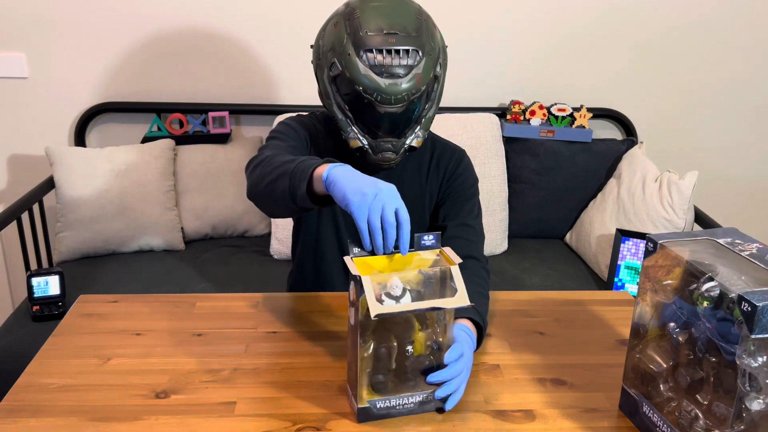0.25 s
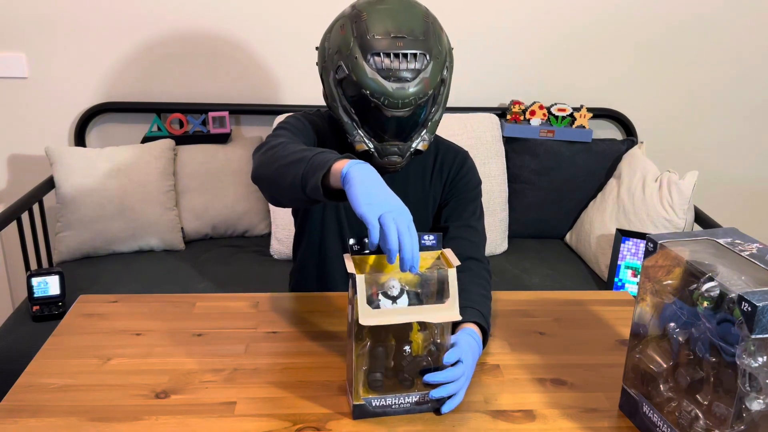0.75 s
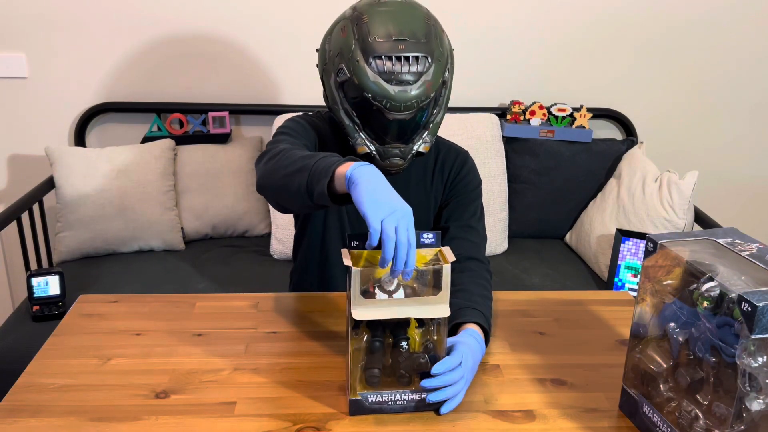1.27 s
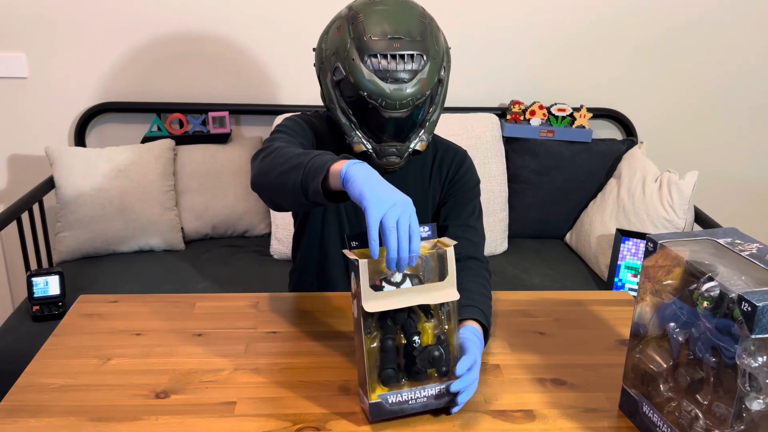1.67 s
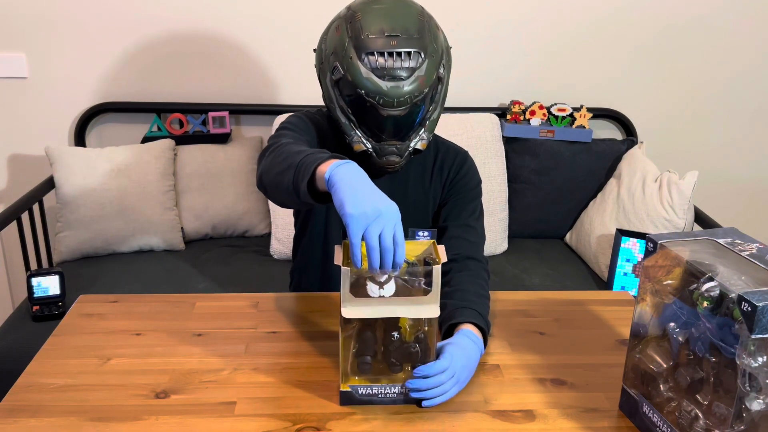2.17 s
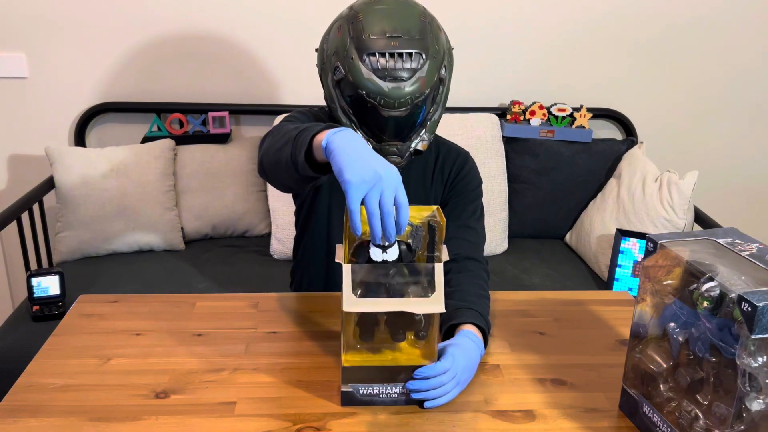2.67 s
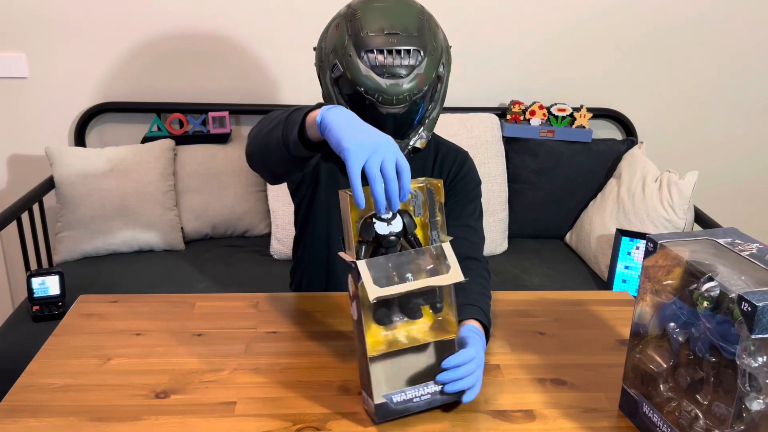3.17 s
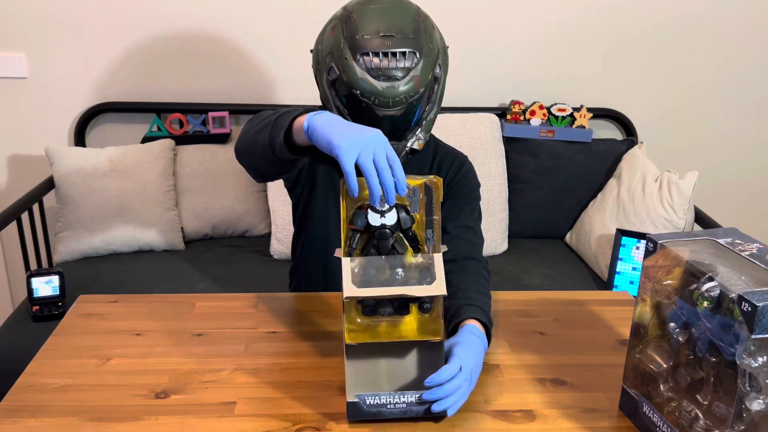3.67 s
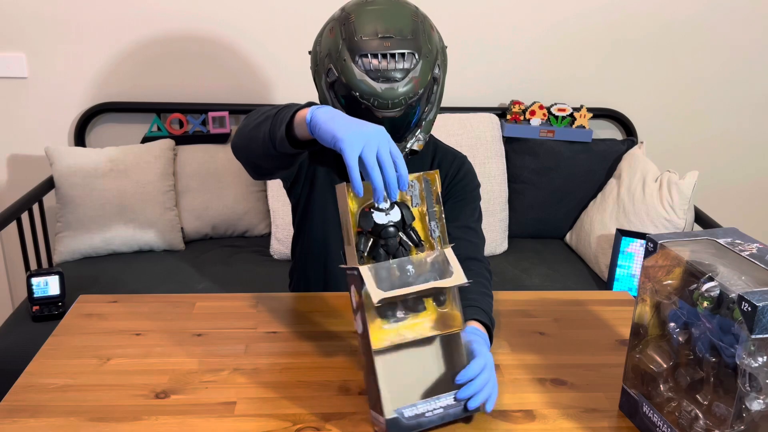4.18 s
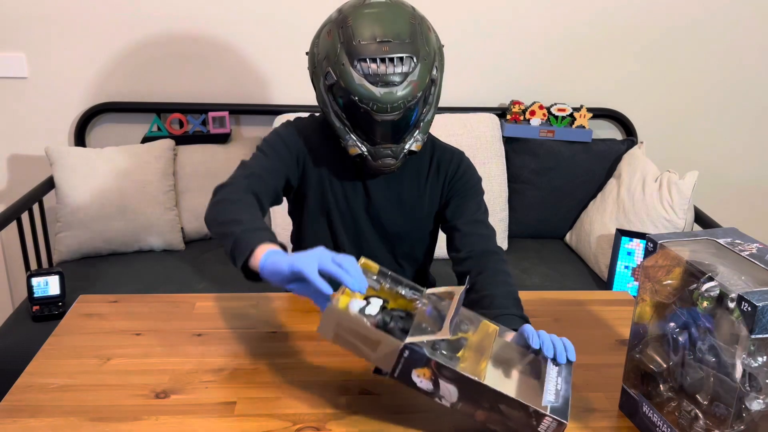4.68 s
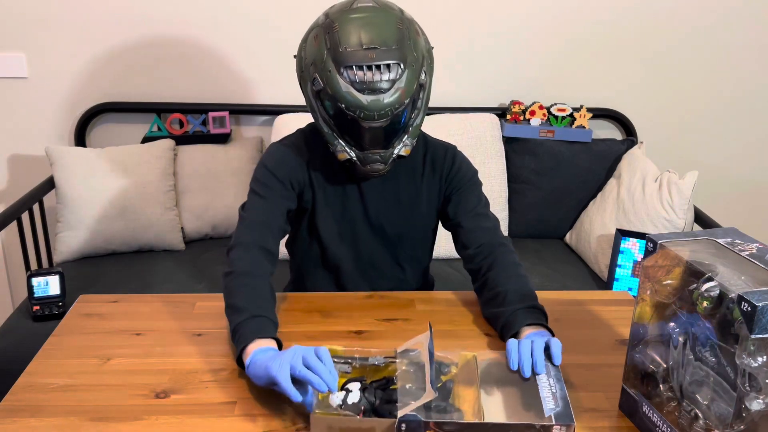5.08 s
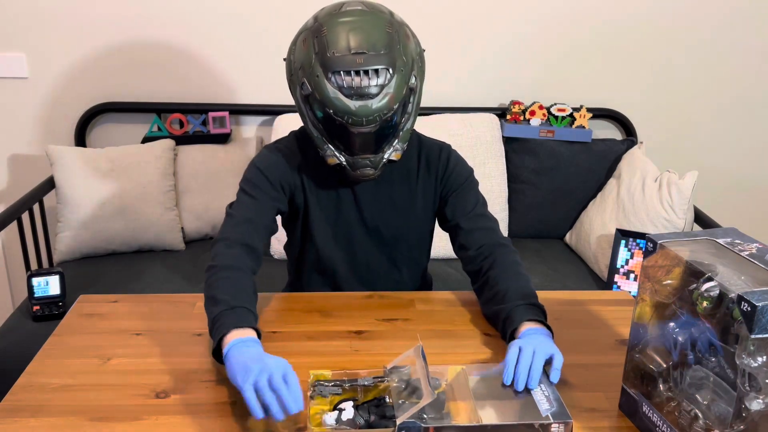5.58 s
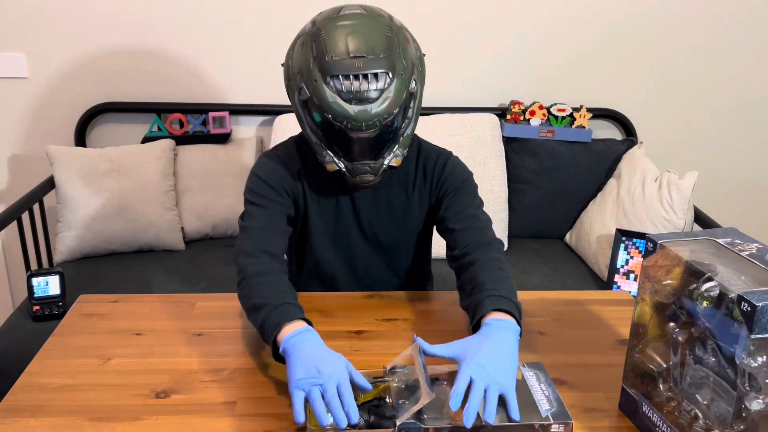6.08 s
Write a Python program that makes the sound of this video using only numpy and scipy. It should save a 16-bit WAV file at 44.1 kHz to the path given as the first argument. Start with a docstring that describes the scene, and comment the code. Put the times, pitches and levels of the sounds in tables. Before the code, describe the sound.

In a furnished room, heard from about two metres, someone works a plastic tray out of a cardboard box. Early bumps lead to a loud thump that rings the box and the wooden table beneath. Card scrapes unevenly against plastic between small knocks, the tray snaps, and the sliding grows faint. Later, busier crackles and scrapes end in another loud thump, followed by light taps. Each hit leaves a short room ring.

```python
"""A furnished room, phone microphone a couple of metres from a wooden table, where gloved hands work a
plastic tray out of a cardboard box. The box knocks a few times, then takes a loud blow at 0.8 s.
Lighter knocks and the stick-slip scrape of card follow; the tray snaps at 2.5 s and slides on quietly.
From 4.7 s crackle and scraping build to a second loud blow at 5.4 s, and a few taps finish.
Each blow rings the box and the table, and the room rings after it."""
import sys
import numpy as np
from scipy import signal
from scipy.fft import rfft, irfft
from scipy.io import wavfile
from scipy.ndimage import uniform_filter1d, map_coordinates

SR = 44100
rng = np.random.default_rng(int(sys.argv[2]) if len(sys.argv) > 2 else 0)


def master_out(mix):
    """Clip the mix to full scale and print it as 16-bit PCM to the path in sys.argv[1]."""
    frames = np.transpose(np.atleast_2d(mix))
    ceiling = np.clip(frames, -1, 1)
    pcm = np.round(ceiling * 32767).astype(np.int16)
    wavfile.write(sys.argv[1], SR, pcm)


N = 279594


def undb(db):
    """Decibels to gain."""
    return 10 ** (np.asarray(db) / 20)


def along(table, hz):
    """Read (pitch_hz, value) rows on a log-frequency axis."""
    pitches, values = np.transpose(table)
    return np.interp(np.log(np.maximum(hz, 1)), np.log(pitches), values)


def causal(db):
    """Minimum-phase response with the given gain, so that nothing rings before a blow."""
    cepstrum = irfft(db * np.log(10) / 20)
    half = len(cepstrum) // 2
    cepstrum[1:half] *= 2
    cepstrum[half + 1:] = 0
    return np.exp(rfft(cepstrum))


def broad_db(spectrum, part=5):
    """Level of a spectrum, averaged over about 1 / part of each bin's frequency on either side."""
    total, bins = np.cumsum(np.abs(spectrum) ** 2), np.arange(len(spectrum))
    lo, hi = bins * (part - 1) // part, np.minimum(bins * part // (part - 1) + 1, bins[-1])
    return 10 * np.log10((total[hi] - total[lo]) / (hi - lo))


def wander(rate_hz):
    """Glide between random values; spread near 1."""
    hold = int(SR / rate_hz)
    return uniform_filter1d(np.repeat(rng.standard_normal(N // hold + 1), hold), hold)[:N]


# Time the room takes to die by 60 dB: pitch_hz, decay_s
ROOM_DECAY = [(60, 0.29), (250, 0.35), (500, 0.35), (1000, 0.4), (3000, 0.4), (8000, 0.37), (15000, 0.13)]
# The room's tail over the direct sound, two metres out: pitch_hz, level_db
ROOM_LEVEL = [(60, -1.5), (250, 2), (1000, 1.5), (3000, 1.35), (8000, 3), (15000, -6)]
# Likeness of the tail at the microphone's left and right ports: pitch_hz, correlation
ROOM_LIKENESS = [(60, .97), (150, .93), (300, .5), (700, .05), (1200, -.2), (2500, 0), (6000, 0),
                 (9000, .4), (15000, .5)]


def room():
    """From table to microphone: direct sound, one wall echo and a dense tail that dies band by band."""
    size = int(SR * .8)
    t, hz = np.arange(size) / SR, np.fft.rfftfreq(size, 1 / SR)
    build_s, echo_s, echo_db, right_lag_s = .0035, .018, -12.5, 5e-5
    response = np.zeros((2, size))
    for centre_hz in 40 * 2 ** np.arange(0, 9, .5):
        band = np.maximum(1 - 2 * np.abs(np.log2((hz + 1) / centre_hz)), 0)
        mid, side = irfft(rfft(rng.standard_normal((2, size))) * np.sqrt(band), size)
        fade = np.exp(-np.log(1000) * t / along(ROOM_DECAY, centre_hz)) * np.minimum(t / build_s, 1)
        alike = along(ROOM_LIKENESS, centre_hz)
        pair = np.sqrt((1 + alike) / 2) * mid + np.sqrt((1 - alike) / 2) * np.array([side, -side])
        response += pair * fade / np.sqrt(np.sum(fade ** 2)) * undb(along(ROOM_LEVEL, centre_hz))
    # the direct sound reaches the left port first, except in the top treble
    lags_s = 16 / SR + np.outer([0, right_lag_s], 1 / (1 + (hz / 10500) ** 4))
    response += irfft(np.exp(-2j * np.pi * hz * lags_s), size)
    response[:, round(echo_s * SR)] += undb(echo_db)
    # smooth the spectrum so that no narrow band rings out
    both = rfft(response.sum(axis=0))
    return irfft(rfft(response) * causal(broad_db(both) - broad_db(both, part=25)), size)


# Clear resonances of the box and the table under it: pitch_hz, width_hz, level_db
BOX_MODES = [(72.4, 18, 7.5), (178, 31, 7), (240, 21, -0.5), (341.6, 34, 7.5), (365, 160, -3),
             (482.2, 12, 8), (560, 31, 0.5), (682.5, 24, 8.5), (844, 48, -3.5), (984.5, 23, 5.5),
             (1662, 64, -2.5), (2738, 230, -17), (2735, 95, -5.5)]


def box_response(hz):
    """The box rings in a few clear modes over an even sheet of overlapping ones."""
    return 1 + sum((-1) ** k * undb(db) * 1j * hz * width / (pitch ** 2 - hz ** 2 + 1j * hz * width)
                   for k, (pitch, width, db) in enumerate(BOX_MODES))


# Card rubbing on card, plastic and table: start_s, held_s, scrape_db, tilt_db_per_octave, rumble_db
STROKES = [(0, 0.0056, -58.5, -2.5, -71), (.1, 0.32, -73.5, 0.5, -63), (.37, 0.14, -67, -4, -63.5),
           (.5, 0.044, -67, -7.5, -58.5), (.75, 0.054, -75, -4, -62), (0.832, 0.06, -60, 2, -47),
           (1.24, 0.077, -69, -4.5, -59), (1.49, 0.064, -69.5, -1, -65.5), (1.7, 0.12, -70.5, -3, -67),
           (2.026, 0.15, -63.5, -1, -65), (2.2, 0.31, -64.5, -1.5, -60), (2.499, 0.38, -68, -1, -79),
           (2.9, 0.31, -73, -3, -94), (3.074, 0.014, -65, 1.5, -61), (3.29, 0.068, -66, -1, -75),
           (3.358, 0.017, -79.5, -11.5, -56.5), (3.54, 0.062, -76, -3.5, -79.5),
           (3.625, 0.032, -68, -3, -77), (3.681, 0.069, -67.5, -1.5, -84.5), (3.929, 0.092, -73, -2.5, -68),
           (4.15, 0.017, -71, -1.5, -64), (4.321, 0.13, -89, -9.5, -70), (4.671, 0.093, -64, -1.5, -68),
           (4.88, 0.065, -70, -4.5, -61.5), (5.116, 0.039, -61.5, -3.5, -58), (5.2, 0.36, -54.5, -2, -58),
           (5.479, 0.00473, -48.5, -4, -43.5), (5.6, 0.086, -74, -5, -65), (5.7, 0.02, -82, 9, -70.5),
           (5.928, 0.045, -91.5, 7, -83.5), (6.13, 0.14, -70, -2, -68)]


def stroke_power(band_hz, is_rumble):
    """Each stroke swells, holds and fades in one band; overlapping strokes add."""
    start_s, held_s, scrape_db, tilt, rumble_db = np.transpose(STROKES)[:, :, None]
    swell_db_per_s, fade_db_per_s = 291, 243  # at a haste of 1
    if is_rumble:  # the table answers late
        level_db, late_s, haste = rumble_db, .035, .85
    else:  # slower rubbing is duller, so the treble swells and fades faster
        octaves = np.log2(band_hz / 1400)
        level_db, late_s, haste = scrape_db + tilt * octaves, 0, 1 + .13 * octaves
    steps = np.arange(0, N, 32)
    age_s = steps / SR - late_s - start_s
    dip_db = haste * np.maximum(-swell_db_per_s * age_s, fade_db_per_s * (age_s - held_s)).clip(min=0)
    return np.interp(np.arange(N), steps, np.sum(undb(level_db - dip_db) ** 2, axis=0))


# Room tone under the strokes, one level a band: boom_db, rumble_db, panel_db, crackle_db
ROOM_TONE = (-89.5, -70.5, -95, -87)


def sliding_card():
    """Stick-slip grit rings the box; each band flickers and follows the strokes above the room tone."""
    hz = np.fft.rfftfreq(N, 1 / SR)
    rumble_hz, scrape_hz, drift = 81, 2300, .07
    slips = rng.standard_normal(N) * undb(2.5 * rng.exponential(size=N) + 2 * wander(30))
    ringing = irfft(rfft(slips) * box_response(hz), N)
    # the modes wander as the tray comes out
    grit = rfft(map_coordinates(ringing, [np.cumsum(1 + drift * wander(4))], mode="wrap"))
    grit *= undb(2.5 / (1 + (2 * np.log((hz + 1) / scrape_hz)) ** 2))  # card on plastic scrapes most here
    bands_hz = (450, rumble_hz, 1400, 5000)
    centres, out = np.sort(bands_hz), 0
    for band_hz, tone_db in zip(bands_hz, ROOM_TONE):
        share = np.interp(np.log(hz + 1), np.log(centres), centres == band_hz)
        band = irfft(grit * share / np.sqrt(hz + 120), N)
        power = stroke_power(band_hz, band_hz == rumble_hz) + undb(tone_db) ** 2
        flicker = undb(1.4 * wander(10))
        out += band / band.std() * np.sqrt(power) * flicker
    return out


def contacts(t, rise_s, rattle_s):
    """A short shower of small contacts around one hard one; a quicker blow is a harder one."""
    push = np.minimum(t / rise_s, 1) ** 2 * np.exp(-t / rattle_s)
    shower = push * rng.standard_normal(len(t)) * undb(3.69 * rng.exponential(size=len(t)))
    contact_s = .0077 * rise_s
    hard = np.exp(-np.abs(t - rise_s) / contact_s) * (t >= rise_s)
    return shower / np.sqrt(np.sum(shower ** 2)) + .017 / np.sqrt(rise_s) * hard / hard.sum()


# Where box, table, card panels and plastic sound in a blow: boom_hz, thud_hz, panel_hz, crackle_hz
BLOW_BANDS = (450, 140, 1400, 5000)


def blow_colour(hz, boom_db, panel_db, crackle_db, spot_hz, ring_db):
    """Spectrum of a blow in dB; modes near the struck spot's own pitch take most of it."""
    deep_hz, edge_hz = 69.3, 16300
    # low blows reach the table, high ones hardly
    thud_db = boom_db + max(-10 * np.log2(spot_hz / 173), -26.5)
    # a dull blow goes on dulling above the crackle
    edge_db = crackle_db + 7 + .93 * (crackle_db - panel_db)
    bands = zip((*BLOW_BANDS, edge_hz, deep_hz),
                (boom_db, thud_db, panel_db, crackle_db, edge_db, thud_db - 8))
    # each band's level is spread over its width
    density = sorted((pitch, db + 10 * np.log10(SR / 2 / pitch)) for pitch, db in bands)
    return along(density, hz) + ring_db / (1 + (7.74 * np.log((hz + 1) / spot_hz)) ** 2)


# Knocks of the box and snaps of the tray, at the table; the rows at 0.212 s and 5.46 s are the wall's answer to
# the blow 20 ms before them: # time_s, boom_db, panel_db, crackle_db, spot_hz, ring_db, rise_s, rattle_s
BLOWS = [(.04, -33.5, -44.5, -57, 494, 7.5, .009, 0.004), (.055, -30, -41.5, -72, 560, 1, 0.0031, 0.0057),
         (.192, -32.5, -43, -110, 582, 12, 0.0007, 0.0015), (.212, -34, -58, -84, 470, 5, 0.004, 0.033),
         (.378, -40.5, -46.5, -50.5, 393, 0, 0.015, 0.0047),
         (.39, -59, -48, -54, 3000, -13, 0.00078, 0.003),
         (.493, -43, -40.5, -51.5, 450, 2.5, 0.0031, 0.007),
         (.701, -62, -54.5, -64, 1017, -1, 0.0021, 0.0053), (.761, -63, -55, -89, 1100, 9, 0.0007, 0.0055),
         (.78, -46, -65.5, -80, 240, 14, 0.0032, 0.027),
         (.811, -23.5, -33.5, -34, 2010, -5, 0.0044, 0.0085), (.82, -15, -17, -35, 676, 2, 0.0093, 0.011),
         (.822, -31, -21, -46, 1010, 6.5, 0.0022, 0.0045), (.876, -27.5, -34, -65, 630, 3.5, 0.0031, 0.016),
         (1.174, -48.5, -50.5, -66, 640, 9.5, 0.0016, 0.0074),
         (1.296, -31, -38.5, -76, 493, 6.5, 0.0068, 0.0055),
         (1.516, -47.5, -51.5, -57.5, 1070, 8, 0.032, 0.02),
         (1.663, -46, -49, -49, 1240, 8.5, 0.001, 0.042),
         (1.676, -37.5, -46, -106, 345, 1.5, 0.0019, 0.026),
         (1.812, -45, -45, -48, 1210, 17, 0.00073, 0.0086),
         (1.834, -50.5, -52, -53.5, 1190, 13, .001, 0.006),
         (2.018, -67, -58, -54.5, 1450, 12.5, 0.0019, 0.0089),
         (2.062, -34.5, -46.5, -57, 168, 5.5, 0.0039, 0.001),
         (2.066, -50.5, -77, -92, 70, 15, 0.0043, 0.015), (2.234, -40, -39.5, -52, 473, 11.5, 0.001, 0.008),
         (2.354, -40.5, -44, -54, 246, 7.5, 0.0018, 0.023),
         (2.522, -37.5, -29, -56, 3100, 8.5, 0.00048, 0.002),
         (3.1, -51, -67, -59.5, 287, 11.5, 0.0049, 0.021), (3.385, -49, -64, -81.5, 560, -1, 0.0052, 0.01),
         (4.178, -58, -54.5, -72, 700, 7, 0.0038, 0.0085),
         (4.287, -55, -54, -78.5, 395, 8.5, 0.00076, 0.007),
         (4.369, -64, -62.5, -83.5, 1173, 12.5, 0.0026, 0.033),
         (4.545, -71, -68, -84, 490, 16.5, 0.0028, 0.0086),
         (4.66, -40.5, -38.5, -47.5, 2000, 7, 0.0019, 0.014),
         (4.856, -35.5, -45, -55.5, 208, 10, 0.00084, 0.011),
         (5.02, -44.5, -54, -63.5, 298, 3, 0.0024, 0.09), (5.086, -39, -46, -61.5, 424, -2, 0.007, 0.0098),
         (5.156, -44, -33, -54, 907, 6.5, 0.0011, 0.0068),
         (5.197, -33, -41.5, -43, 1332, 9.5, 0.0029, 0.014),
         (5.225, -29.5, -46, -50.5, 400, 5, 0.011, 0.0083),
         (5.282, -32.5, -31.5, -38, 953, -1, 0.0085, 0.015),
         (5.304, -45.5, -43.5, -42.5, 960, 13.5, 0.001, 0.0056),
         (5.35, -34, -29, -54, 263, 12, 0.0014, 0.035),
         (5.364, -42.5, -49, -46, 4990, -0.5, 0.00062, 0.0099),
         (5.439, -16, -15.5, -25.5, 530, 8, 0.0088, 0.011),
         (5.443, -31.5, -34, -54.5, 1555, 19.5, .002, 0.0034),
         (5.46, -41, -40.5, -46, 560, -1, 0.0035, 0.011),
         (5.757, -97, -68, -64.5, 8060, 16.5, 0.0043, 0.004),
         (5.958, -97, -81, -72.5, 6040, 6, .002, 0.0024), (6.093, -46, -58, -65, 377, 7, 0.0053, 0.024),
         (6.199, -45.5, -41, -48.5, 935, 9.5, 0.0043, 0.013)]


def knocks_and_snaps():
    """Each blow's contacts ring the box, coloured by where they land; blows alternate on two tracks."""
    size = 16384
    t, hz = np.arange(size) / SR, np.fft.rfftfreq(size, 1 / SR)
    blow_s = .002  # a blow's levels are its energy spread over this time
    bass_late_s, bass_hz = .018, 69.3  # delay at that pitch; the table carries lower notes more slowly
    dispersion = np.exp(2j * np.pi * bass_late_s * bass_hz ** 2 / np.maximum(hz, 35))
    tracks = np.zeros((2, N + size))
    for k, (time_s, *tone, rise_s, rattle_s) in enumerate(BLOWS):
        ring = box_response(hz * (1 + .025 * rng.standard_normal()))  # grip and bending shift the modes
        force = rfft(contacts(t, rise_s, rattle_s))
        # the spot, not the fall of the shower, sets the broad colour
        colour = causal(blow_colour(hz, *tone) - broad_db(force))
        start = int((time_s - rise_s) * SR)
        tracks[k % 2, start:start + size] += irfft(force * colour * ring * dispersion)
    return np.sqrt(blow_s * SR) * tracks[:, :N]


def scene():
    """Alternate blows and the rubbing each get their own room tail, so their ring varies."""
    sources = (*knocks_and_snaps(), sliding_card())
    return sum(signal.fftconvolve(source[None], room())[:, :N] for source in sources)


# Overall tone colour, with thin bass, a hollow near 10 kHz and a soft top: pitch_hz, gain_db
TONE_COLOUR = [(20, -15), (45, -2), (70, -5.5), (6000, 1.5), (8500, -2), (9800, -14), (12000, -4.5),
               (15500, -13)]
# Balance of the microphone's two ports: pitch_hz, left_minus_right_db
MIC_BALANCE = [(60, 0), (200, .8), (700, 2.2), (1500, .7), (2800, 1), (4500, 7), (7000, 6), (9000, 0),
               (15000, 0)]


def record(dry):
    """The left port favours the treble; the whole sound takes its tone colour and loses the very top."""
    hz, top_hz = np.fft.rfftfreq(8192, 1 / SR), 15900
    gain_db, balance_db = along(TONE_COLOUR, hz), along(MIC_BALANCE, hz)
    ports = irfft([causal(gain_db + side * balance_db / 2) for side in (1, -1)])
    heard = signal.fftconvolve(dry, ports, axes=1)[:, :N]
    return signal.sosfilt(signal.ellip(10, .2, 80, top_hz, fs=SR, output="sos"), heard)


dry = scene()
out = record(dry)
master_out(out)
```